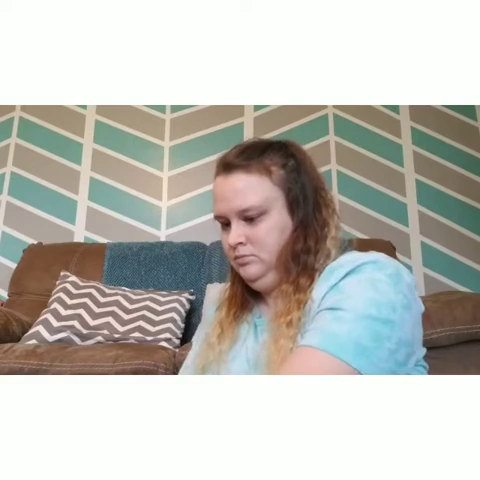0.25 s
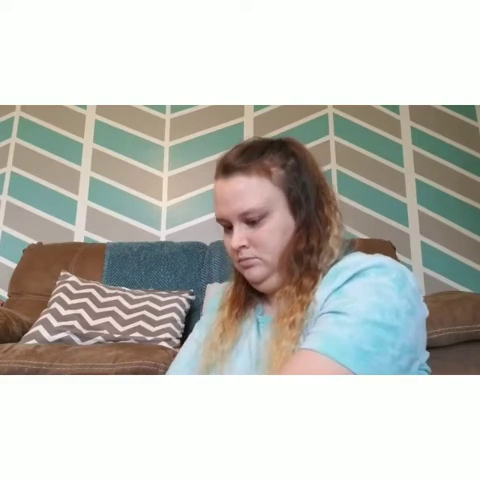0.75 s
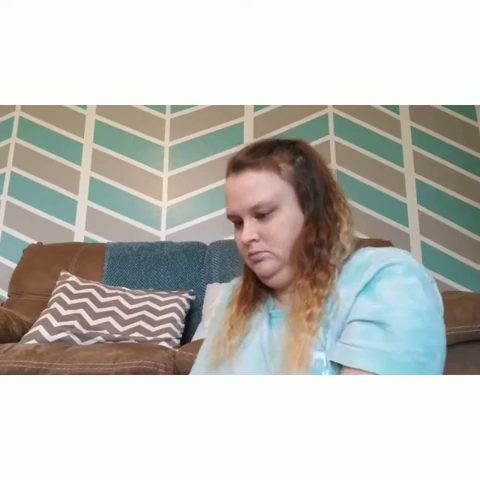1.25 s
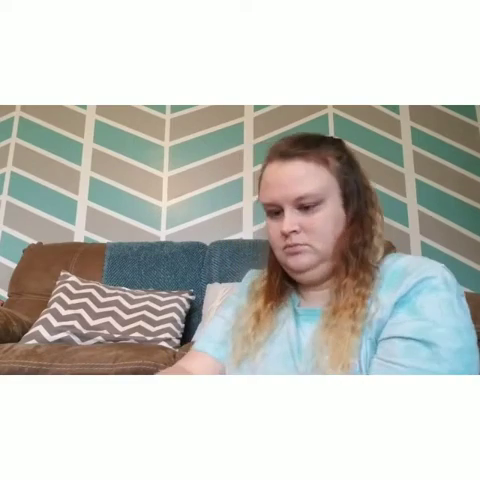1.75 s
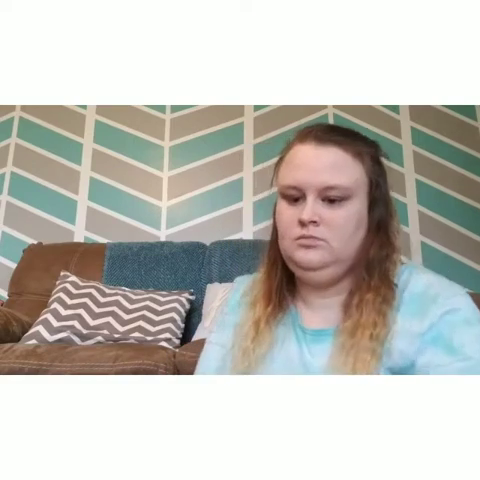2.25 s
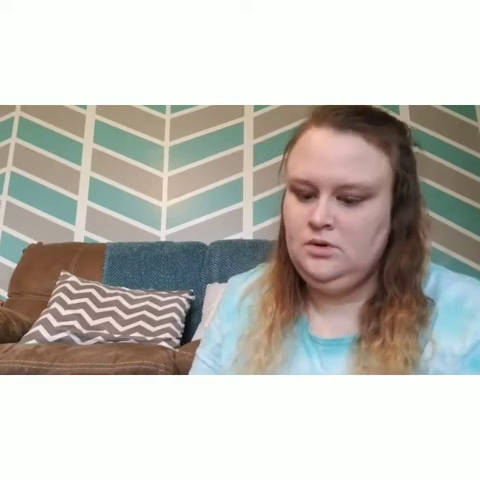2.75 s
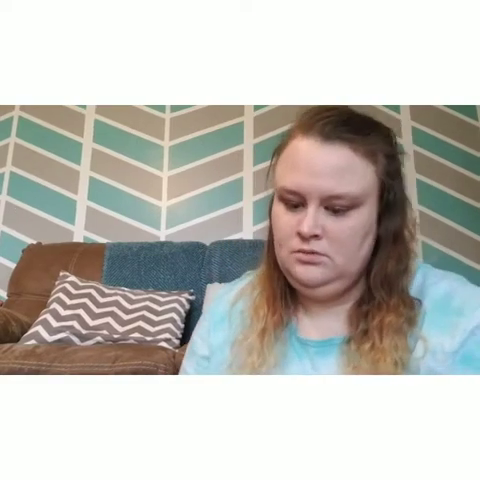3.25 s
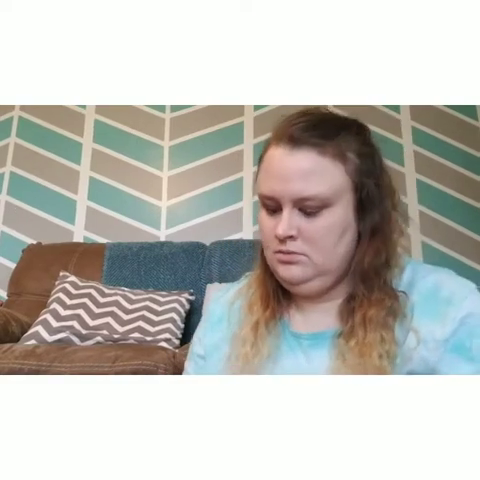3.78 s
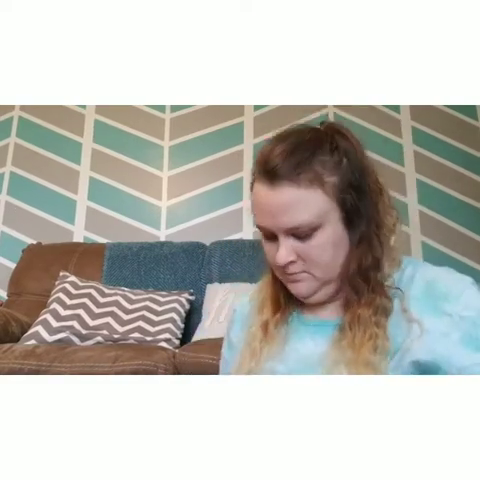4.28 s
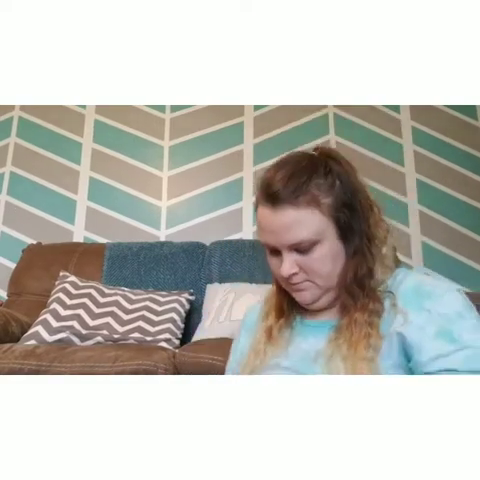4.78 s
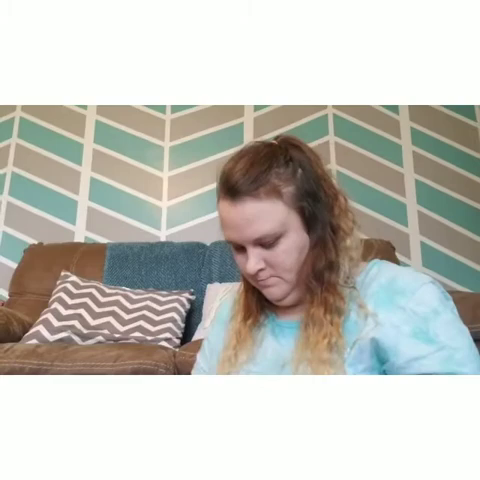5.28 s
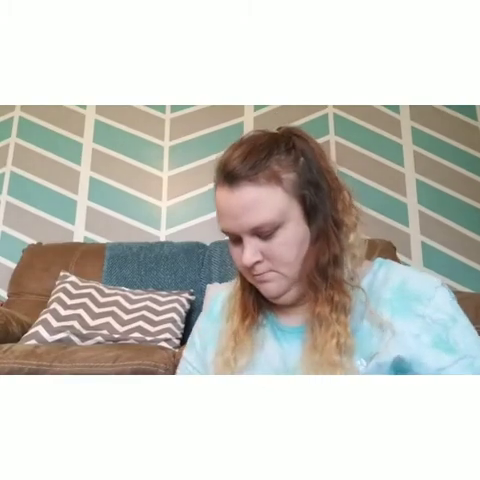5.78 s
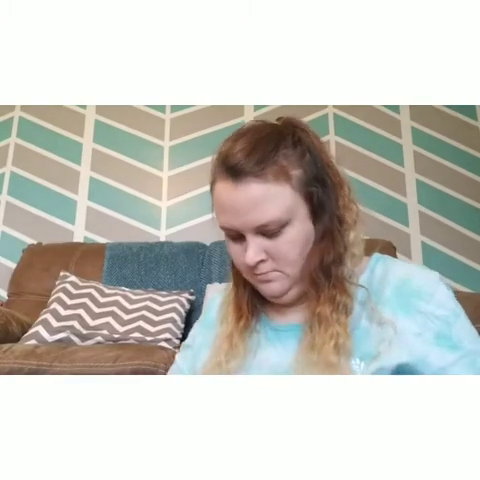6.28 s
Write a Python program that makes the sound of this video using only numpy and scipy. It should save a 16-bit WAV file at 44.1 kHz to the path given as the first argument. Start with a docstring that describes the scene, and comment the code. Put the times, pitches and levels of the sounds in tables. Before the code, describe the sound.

Close, irregular handling of a shipping box indoors: half a second of near silence, soft card friction, a strong thud with a crisp snap just after one second, then sparse picking and knocks. From about three seconds sticky tape comes away in scratchy, snapping jerks, growing denser until a hard tearing rip near six seconds. Short room reflections, faint low background hush, small stereo microphone.

```python
"""First the hush of a living room, then the rustle of hands sliding over a taped cardboard box.
The hands bump the box, pick at the tape, peel it in short pulls and finally rip it loose, close by.
Friction is coloured noise broken into random grains; snaps are short noise bursts with a pulse.
Bumps are decaying sines; creaks are stick-slip impulses ringing panel modes.
All but the hush pass through early reflections and a diffuse room echo."""
import sys
import numpy as np
from scipy import signal
from scipy.fft import rfft, irfft, next_fast_len
from scipy.io import wavfile

SR = 44100
rng = np.random.default_rng(int(sys.argv[2]) if len(sys.argv) > 2 else 0)


def waveform_to_disk(signal):
    """Save audio, clipped to [-1, 1], as 16-bit WAV at the path in sys.argv[1]."""
    frames = np.transpose(np.atleast_2d(signal))
    scaled = np.clip(frames, -1, 1) * 32767
    samples = np.round(scaled).astype(np.int16)
    wavfile.write(sys.argv[1], SR, samples)


N = 287959
TIME = np.arange(N) / SR
SIZE = next_fast_len(N + SR, True)   # transform length, padded so that filters can ring out
HZ = np.maximum(np.fft.rfftfreq(SIZE, 1 / SR), 1)

# A hand slides over card or draws the tape; the sound swells, holds and lets go:
# (full force [s], hold [s], panel rumble [dB], rasp [dB], fibre sizzle [dB]), relative levels
PULLS = [(0.485, 0.027, -58, -66.5, -59.5), (0.556, 0.049, -51.5, -55.5, -50.5),
         (0.703, 0.16, -55, -61, -56.5), (0.8, 0, -42.5, -55.5, -61), (1.037, 0.05, -72, -60.5, -53),
         (1.198, 0, -42.5, -42, -43.5), (1.31, 0.013, -46, -46, -65), (1.38, 0.094, -54, -54, -57),
         (1.5, 0, -66, -50, -45), (1.546, 0.05, -48.5, -47.5, -45), (1.663, 0.038, -46.5, -49.5, -51),
         (1.8, 0.023, -70, -56.5, -56), (2.004, 0.14, -61.5, -56.5, -49.5), (2.472, 0.042, -63, -57, -62),
         (2.628, 0.16, -54.5, -57.5, -63.5), (2.862, 0.15, -66, -59.5, -68), (3.48, 0.23, -64, -62, -78),
         (3.664, 0.014, -44.5, -46.5, -60), (3.778, 0, -53, -47, -53), (3.915, 0.073, -56.5, -63, -60.5),
         (4.128, 0.074, -47.5, -56, -57.5), (4.359, 0.041, -50, -46.5, -48.5),
         (4.459, 0.02, -50, -46.5, -50.5), (4.576, 0.076, -66, -46.5, -43), (4.63, 0.019, -35.5, -34, -41),
         (4.83, 0.11, -70.5, -69, -60.5), (4.977, 0.025, -52, -43.5, -47.5), (5.163, 0, -52.5, -44.5, -51),
         (5.277, 0.21, -55.5, -47.5, -53.5), (5.678, 0.02, -51.5, -45, -50),
         (5.857, 0.021, -57.5, -55, -47), (5.93, 0, -60, -50, -42), (6.294, 0.013, -47.5, -42.5, -50)]
SWELL_DB_PER_S, LET_GO_DB_PER_S = 268, 239
# Tape or card gives way all at once and the rustle dies down:
# (time [s], panel rumble [dB], rasp [dB], fibre sizzle [dB]), relative levels
JERKS = [(0.909, -53, -53.5, -47.5), (1.146, -49, -65, -46.5), (1.255, -40, -38.5, -37.5),
         (2.131, -49.5, -48.5, -50), (2.408, -44, -44, -49), (3.265, -47, -43, -50.5),
         (3.437, -52.5, -54, -63), (3.615, -42, -42.5, -46), (3.839, -49, -49, -55.5),
         (4.016, -45.5, -58, -53.5), (4.307, -55, -55.5, -57), (5.201, -39.5, -36.5, -36.5),
         (5.61, -53, -44.5, -47), (5.728, -43, -62, -50), (5.878, -50, -39.5, -50),
         (5.918, -45, -32.5, -38), (5.962, -31.5, -28.5, -27), (6.164, -53, -53, -73),
         (6.242, -45, -43, -55), (6.391, -55.5, -48, -43.5)]
JERK_RISE_DB_PER_S, JERK_FALL_DB_PER_S = 992, 200
# Fingers resting lightly on the box: (panel rumble [dB], rasp [dB], fibre sizzle [dB]), relative levels
TOUCH_LEVELS = (-71, -69, -66)
TOUCH_FROM_S = 0.42
# Each new grip leaves another patch of card and length of tape free to ring:
# (start [s], panel [Hz], panel lift [dB], flap [Hz], tape [Hz], tape lift [dB], left over right [dB])
GRIPS = [(0, 690, 8.5, 205, 6900, 2.5, -1), (0.766, 218, 12, 636, 7000, -1.5, 0.5),
         (.88, 770, 17, 433, 6800, 1.5, 1.5), (1.174, 133, -9, 540, 1130, 13, 1),
         (1.25, 244, 4, 1030, 2040, 20, 1), (1.45, 215, 5, 990, 1460, 6, 1.5),
         (1.78, 695, 10.5, 227, 1910, 2, 1), (2.451, 91, 17, 580, 1700, 3, 2.5),
         (2.8, 129, 12.5, 744, 5900, 3, 2), (3.2, 724, 9.5, 400, 5200, 0.5, 0.5),
         (3.8, 245, 7, 406, 4040, 2, -0.5), (4.28, 610, 6, 316, 3930, 9, 2),
         (4.55, 280, 9.5, 470, 3400, 10, 1.5), (5.17, 317, 9.5, 603, 2990, 10, 1),
         (5.56, 730, 11, 298, 2750, 11, -1.5), (5.719, 243, 9, 640, 5730, 6.5, -3),
         (5.864, 492, 16, 400, 3130, 3, 0), (6.129, 300, 11.5, 780, 1480, 3, 1.5)]
PEEL_FROM_S, RIP_FROM_S = 3.1, 5.8   # grips starting from here on peel, then rip
# Spectrum of the jolts that shake the panels: (frequency [Hz], level [dB])
RUMBLE_SPECTRUM = [(29, -53), (50, -10.5), (108, -6), (223, 0.5), (253, -6.5), (314, -2.5), (346, -6),
                   (474, -5), (554, -4.5), (993, -5), (1160, -13.5), (1500, -2.5), (1950, -56)]
# Spectrum of sliding over card: (frequency [Hz], level [dB])
SLIDE_SPECTRUM = [(530, -49), (900, 2.5), (991, 1), (1190, -5), (1990, -6), (2660, -4.5), (4570, -3),
                  (5350, -5.5), (7580, -5), (8550, -12), (9770, -12), (15100, -3), (16000, -7)]
# Spectrum of peeling tape: (frequency [Hz], level [dB])
PEEL_SPECTRUM = [(530, -16), (900, -44), (1000, 4), (1160, -5.5), (1640, -2), (1850, -6.5), (2730, -2.5),
                 (3110, -1.5), (3430, -6), (4520, -2), (5680, -5), (7400, -7), (8980, -17), (15100, -7.5),
                 (16000, -12)]
# Spectrum of the rip: (frequency [Hz], level [dB])
RIP_SPECTRUM = [(530, -35), (900, 2), (1130, -6), (1310, -2.5), (1750, -10), (2450, -2.5), (3000, -2),
                (3730, -6.5), (5350, -9), (6480, -7.5), (9310, -18), (14700, -9), (16000, -16)]
# Snaps of tape and card, with relative levels of three bands:
# (time [s], decay [s], ring [Hz], body [dB], crack [dB], top [dB], left over right [dB])
SNAPS = [(0.902, 0.0012, 7120.0, -44.5, -41, -44.5, 3.5), (1.2563, 0.002, 5100, -33, -38.5, -29.5, 4),
         (1.491, 0.00054, 6140.0, -52, -64, -58, 10), (1.6366, 0.0005, 5830.0, -57, -59, -59, 1),
         (1.6753, 0.0018, 1910.0, -48, -46.5, -62, 4.0), (2.129, 0.0013, 2070, -38, -52, -51.5, 1.0),
         (2.1384, 0.0023, 2440.0, -47.5, -46, -37, 0), (2.3496, 0.0008, 7080.0, -50.5, -63, -54, 3),
         (2.3962, 0.00089, 1860, -27.5, -35, -38, 0.5), (2.4143, 0.0009, 1830.0, -33, -44.5, -56, -2.0),
         (2.6351, 0.00053, 4150.0, -51, -66, -72, -6), (2.7389, 0.0012, 3600, -39, -41, -41, -0.5),
         (3.2453, 0.0027, 3640.0, -69, -40.5, -52.5, 0), (3.2507, 0.0015, 3900, -42.5, -29, -43, 0.5),
         (3.4368, 0.00065, 3740, -67, -51.5, -65, -3), (3.5938, 0.0037, 4160.0, -73, -39, -42.0, 1),
         (3.6047, 0.0011, 4400, -48, -23.5, -34, -0.5), (3.611, 0.00089, 3400, -61, -28.0, -45, -3.0),
         (3.6308, 0.00067, 6060.0, -66, -42, -53.0, -2), (3.9834, 0.0007, 4310.0, -76.5, -53.5, -53.5, -2),
         (4.1231, 0.00055, 4460.0, -63, -45.5, -50.5, 3), (4.163, 0.00098, 5260.0, -48, -50, -49, 4),
         (4.6211, 0.002, 4370.0, -57, -32.5, -54, -4), (4.6264, 0.0016, 4080.0, -54, -36, -52, -7),
         (4.9685, 0.0016, 4250, -58, -39, -56, 4), (5.1518, 0.00076, 3720.0, -51, -34, -55, 0.0),
         (5.1923, 0.0017, 4570, -39.5, -22, -24.5, 0), (5.3197, 0.0014, 3380, -69, -38.5, -57, -3),
         (5.3674, 0.0013, 3730, -70, -41.0, -62, -2), (5.396, 0.00092, 3440, -50.5, -39.5, -57, -6),
         (5.4065, 0.0021, 3300, -58, -35.5, -59, 1.0), (5.5084, 0.0012, 2800.0, -58, -45, -63.5, -2),
         (5.594, 0.0015, 3660, -68, -41, -56.0, -4), (5.6062, 0.00063, 3030, -59, -37.5, -61, 1.0),
         (5.643, 0.0009, 4470, -46, -37.5, -35, 2), (5.6758, 0.0022, 3170, -51, -40.5, -54, 4),
         (5.6794, 0.0025, 2770, -57, -36, -55, 3), (5.7342, 0.0024, 4460.0, -36, -53, -43, 5),
         (5.8769, 0.0028, 1510, -32.5, -36.5, -40, 2.5), (5.933, 0.00061, 3080.0, -58, -39.5, -41, 5.0),
         (5.9508, 0.0015, 3200.0, -44.0, -28, -24, 14), (5.964, 0.002, 2980, -31.5, -30, -32, -3),
         (5.9681, 0.0031, 2990.0, -35, -29, -41, 1), (6.023, 0.0025, 3200, -35.5, -39, -36.5, 3),
         (6.158, 0.001, 1570, -37.5, -44, -54, 3.5), (6.2458, 0.0011, 2180, -42, -41.5, -51.0, -1),
         (6.2834, 0.0008, 4670, -42, -40.5, -55, 7), (6.3831, 0.0012, 7100, -52, -40, -31.5, 1)]
# Spectrum shared by the snaps: (frequency [Hz], level [dB])
SNAP_SPECTRUM = [(88, -43), (150, -4), (321, -11), (649, -2), (1120, -9), (1530, -3), (1870, 1),
                 (2270, -3.5), (4160, 0), (6260, -4.5), (7470, 3), (8230, -6), (11500, -2), (13400, 5.5),
                 (16000, 26.5)]
# Dull bumps and knocks on the box: (time [s], main mode [Hz], relative level [dB], 60 dB decay [s])
BUMPS = [(0.793, 194, -37.5, 0.048), (1.189, 127, -22.5, 0.063), (1.2395, 121, -11.5, 0.01),
         (1.539, 113, -40.5, 0.11), (1.684, 119, -36, 0.033), (1.998, 527, -43, 0.037),
         (2.275, 573, -49, 0.037), (2.395, 678, -32.5, 0.05), (2.396, 1930, -29.5, 0.014),
         (2.459, 77.5, -51.5, 0.45), (2.634, 650, -43.5, 0.028), (3.083, 738, -51.5, 0.025),
         (3.837, 270, -41.5, 0.051), (5.231, 313, -36.5, 0.09), (5.735, 276, -32, 0.023),
         (5.8767, 1350, -31, 0.02), (5.963, 524, -32, 0.047), (6.157, 322, -35.5, 0.036)]
# A flap sticks and slips under strain:
# (start [s], end [s], mean slip rate [about 1/s], relative level [dB], low-mode lean [dB], high-mode lean [dB])
CREAKS = [(2.649, 2.759, 106, -47, 2.5, -0.5), (4.047, 4.136, 104, -45.5, -8, -8.5)]
# Modes of the box panels: (frequency [Hz], relative level [dB], 60 dB decay [s])
PANEL_MODES = [(122, -5, .07), (215, -6, .03), (314.5, 0, .15), (424, -1, .15), (580, -7, .04),
               (787, -8, .07), (1560, -17, .03)]
# Spectrum of the quiet room: (frequency [Hz], level [dB])
HUSH_SPECTRUM = [(15, -42), (25, -14), (40, -6.5), (59, -5), (180, -26.5), (317, -23), (400, -27.5),
                 (2050, -33), (7310, -39.5), (8590, -44.5), (14800, -27.5), (16000, -48)]
HUSH_DB = -69.5
# Stereo width of two microphone ports: (frequency [Hz], side over mid [dB])
STEREO_WIDTH = [(60, -10), (250, -15), (500, -12.5), (1000, -3), (2000, -4), (4000, 0), (15000, 1.5)]
# Balance of the two ports: (frequency [Hz], left over right [dB])
PORT_BALANCE = [(100, 1), (1000, 0), (2000, 1.5), (2800, 3), (4200, -4.5), (6400, 3), (10000, 0),
                (14000, 4.5)]
ROOM_T60_S = 0.36
MIC_LOW_HZ, CUTOFF_HZ = 64, 16000


def friction(panel_db, rasp_db, sizzle_db, flap_lift_db=7, panel_sharpness=4.3, tape_sharpness=2.54):
    """Granular friction: fibre releases excite resonances of tape and card, and jolts shake the panels."""
    slide = colour(grains(per_s=500, spread_db=4.5, grain_s=.0004, smooth=.75), SLIDE_SPECTRUM)
    peel = colour(grains(per_s=600, spread_db=2.8, grain_s=.0006, smooth=.6), PEEL_SPECTRUM)
    rip = colour(grains(per_s=850, spread_db=2.5, grain_s=0.00099, smooth=0.35), RIP_SPECTRUM)
    jolts = colour(grains(per_s=140, spread_db=0.0, grain_s=0.012, smooth=0.2), RUMBLE_SPECTRUM)
    out = np.zeros((2, N))
    edges = [0] + [round(grip[0] * SR) for grip in GRIPS[1:]] + [N]
    for grip, start, end in zip(GRIPS, edges, edges[1:]):
        s, panel_hz, panel_lift_db, flap_hz, tape_hz, tape_lift_db, side_db = grip
        held = slice(max(start - SR // 20, 0), end)   # the card is already ringing when the grip changes
        if s < PEEL_FROM_S:
            surface = slide
        elif s < RIP_FROM_S:
            surface = peel
        else:
            surface = rip
        surface = lift(surface[:, held], tape_hz, tape_lift_db, tape_sharpness)
        panel = lift(jolts[:, held], panel_hz, panel_lift_db, panel_sharpness)
        panel = lift(panel, flap_hz, flap_lift_db, panel_sharpness)
        panel = rms_one(band(panel, 53, 1016, order=4)) * from_db(panel_db[held] - 4.0)
        rasp = rms_one(band(surface, 1023, 7540, order=4)) * from_db(rasp_db[held] - 4.0) * pan(side_db)
        sizzle = rms_one(band(surface, 7930, 19700, order=4)) * from_db(sizzle_db[held] - 1.77)
        out[:, start:end] += (panel + rasp + sizzle)[:, start - end:]
    return out


def effort():
    """Power addition: pulls, jerks and the light touch sum into (panel, rasp, sizzle) envelopes in dB."""
    moves = [(s, hold_s, SWELL_DB_PER_S, LET_GO_DB_PER_S, levels) for s, hold_s, *levels in PULLS]
    moves += [(s, 0, JERK_RISE_DB_PER_S, JERK_FALL_DB_PER_S, levels) for s, *levels in JERKS]
    moves += [(TOUCH_FROM_S, N / SR, SWELL_DB_PER_S, LET_GO_DB_PER_S, TOUCH_LEVELS)]   # held to the end
    t = TIME[::32]   # slow curves need few points
    power = 0
    for s, hold_s, rise, fall, levels in moves:
        shape_db = -rise * np.maximum(s - t, 0) - fall * np.maximum(t - s - hold_s, 0)
        power = power + from_db(np.add.outer(levels, shape_db)) ** 2
    return [np.interp(TIME, t, 10 * np.log10(p + 1e-20)) for p in power]


def grains(per_s, spread_db, grain_s, smooth, tug_db=0.88, tug_hz=35):
    """Random release: fibres let go in tiny bursts of varied size over a hiss that comes in uneven tugs."""
    released = rng.random(N) < per_s / SR
    size = from_db(spread_db * np.minimum(rng.exponential(1, N), 4))
    energy = signal.lfilter([1], [1, -np.exp(-1 / (grain_s * SR))], released * size ** 2 + 1e-18)
    # smooth is the steady share of the power, the rest follows the grains
    hiss = rng.standard_normal((2, N)) * np.sqrt(smooth + (1 - smooth) * energy / energy.mean())
    tugs = rms_one(band(rng.standard_normal(N), tug_hz / 2, tug_hz * 2, order=2))
    return ports(hiss * from_db(tug_db * tugs))


def snaps(body_db=-1.0, crack_db=.7, top_db=.7, rise_share=.5, pulse=3.6, ring_db=9.0, sharpness=2.2):
    """Impulsive fracture: a brief break clicks, while a run of fibres swells and fades over milliseconds."""
    out, lead, length = np.zeros((2, N)), SR // 100, SR // 32
    t = TIME[:length] - TIME[lead]
    # the rise takes rise_share of the decay time
    shapes = np.array([np.exp(-np.maximum(t, -t / rise_share) / row[1]) for row in SNAPS])
    parts = [(260, 1140, body_db), (1840, 7900, crack_db), (7770, 13580, top_db)]
    for k, (low_hz, high_hz, gain_db) in enumerate(parts):
        bursts = rng.standard_normal((len(SNAPS), 2, length)) * shapes[:, None]
        bursts[:, 0, lead] += pulse   # the break itself: one clean pulse at the height of the burst
        bursts = [lift(burst, row[2], ring_db, sharpness) for burst, row in zip(bursts, SNAPS)]
        in_a_row = band(colour(ports(np.hstack(bursts)), SNAP_SPECTRUM), low_hz, high_hz)
        for (s, _, _, *levels_db, side_db), burst in zip(SNAPS, np.split(in_a_row, len(SNAPS), axis=1)):
            at = round(s * SR) - lead
            burst = rms_one(burst) * np.sqrt(.004 * SR / length)   # levels refer to a 4 ms average
            out[:, at:at + length] += burst * from_db(levels_db[k] + gain_db) * pan(side_db)
    return out


def bumps(overtone=1.88, overtone_db=-10, undertone=0.655, undertone_db=-16):
    """Modal ringing: a push on the card excites a main mode and a weaker, shorter one on either side."""
    out, t = np.zeros(N), TIME[:SR // 4]
    for s, hz, db, t60 in BUMPS:
        phase, decay = 2 * np.pi * hz * t, from_db(-60 * t / t60)
        neighbours = from_db(overtone_db) * np.sin(overtone * phase)
        neighbours += from_db(undertone_db) * np.sin(undertone * phase)
        at = round(s * SR)
        out[at:at + len(t)] += from_db(db) * decay * (np.sin(phase) + neighbours * decay)
    return out


def creaks():
    """Stick-slip: uneven slips act as impulses that ring the damped modes of the panels."""
    out = np.zeros(N)
    for start, end, per_s, level_db, low_db, high_db in CREAKS:
        chance = rng.standard_normal((40, 1 + len(PANEL_MODES)))
        intervals = np.exp(.1 * chance[:-1, 0]) / per_s
        slips = start + np.append(0, np.cumsum(intervals))
        kept = slips < end
        sound = np.zeros(N)
        for k, (hz, db, t60) in enumerate(PANEL_MODES):
            force = np.zeros(N)
            force[(slips[kept] * SR).astype(int)] = from_db(3.5 * chance[kept, k + 1])
            lean_db = np.interp(k, [0, 2, len(PANEL_MODES) / 2], [low_db, 0, high_db])
            radius, angle = from_db(-60 / (t60 * SR)), 2 * np.pi * hz / SR
            resonator = [1, -2 * radius * np.cos(angle), radius ** 2]
            ringing = rms_one(signal.lfilter([1], resonator, force + 1e-18))
            sound += from_db(db + lean_db) * ringing
        during = (TIME > start) & (TIME < end)
        out += from_db(level_db) * sound / np.sqrt(np.mean(sound[during] ** 2))
    return out


def room(x, wet_db, early_db=-13, gap_s=.0095, early_span_s=.024, build_s=0.0023, dull_hz=9000, count=9):
    """Reverberation: separate reflections off floor and furniture join a decaying diffuse echo."""
    t = TIME[:SR // 2]
    build = 1 - np.exp(-(np.maximum(t - gap_s / 2, 0) / build_s) ** 2)
    echo = rng.standard_normal((2, len(t))) * from_db(-60 * t / ROOM_T60_S) * build
    echo = signal.sosfilt(signal.butter(1, dull_hz, fs=SR, output="sos"), ports(echo))
    echo *= from_db(wet_db) / np.sqrt(np.sum(echo ** 2) / 2)
    early = np.zeros(len(t))
    delays = gap_s + early_span_s * ((np.arange(count) + rng.random(count)) / count) ** 2
    early[(delays * SR).astype(int)] = rng.choice([-1, 1], count) / np.sqrt(count)
    echo += from_db(early_db) * band(early, 770, 11000, order=1)   # small surfaces return no bass
    return x + signal.fftconvolve(x, echo, axes=1)[:, :N]


def hush():
    """Stationary noise: the steady background of the quiet room is noise given a fixed spectrum."""
    noise = ports(rng.standard_normal((2, N)))
    return from_db(HUSH_DB) * rms_one(colour(noise, HUSH_SPECTRUM))


def ports(pair):
    """Spatial coherence: two unrelated signals become stereo, alike in the bass and apart in the treble."""
    mid, side = rfft(pair, SIZE)
    width = gains(STEREO_WIDTH)
    both = np.array([mid + width * side, mid - width * side]) / np.sqrt(1 + width ** 2)
    tilt = gains(PORT_BALANCE)
    both = both * np.array([tilt, np.ones_like(tilt)]) / np.sqrt((1 + tilt ** 2) / 2)
    return irfft(both, SIZE)[:, :pair.shape[-1]]


def pan(db):
    """Constant power: left and right gains differ by the given dB at equal total power."""
    pair = np.array([from_db(np.atleast_1d(db) / 2), from_db(-np.atleast_1d(db) / 2)])
    return pair / np.sqrt(np.mean(pair ** 2, axis=0))


def lift(x, hz, lift_db, sharpness):
    """Resonance: a peak filter raises the sound around one frequency."""
    b, a = signal.iirpeak(hz, sharpness, fs=SR)
    return x + (from_db(lift_db) - 1) * signal.lfilter(b, a, x)


def colour(x, points):
    """Minimum phase: a folded cepstrum turns a spectrum into a causal filter."""
    cepstrum = irfft(np.log(gains(points)), SIZE)
    cepstrum[1:SIZE // 2] *= 2
    cepstrum[SIZE // 2 + 1:] = 0
    return irfft(rfft(x, SIZE) * np.exp(rfft(cepstrum)), SIZE)[..., :x.shape[-1]]


def gains(points):
    """Logarithmic pitch scale: levels are interpolated over log frequency and turned into gains."""
    hz, db = np.transpose(points)
    return from_db(np.interp(np.log(HZ), np.log(hz), db))


def band(x, low_hz, high_hz, order=3):
    """Band limiting: a Butterworth filter passes one frequency range."""
    return signal.sosfilt(signal.butter(order, [low_hz, high_hz], "band", fs=SR, output="sos"), x)


def rms_one(x):
    """Normalisation: scale to unit mean power."""
    return x / np.sqrt(np.mean(x ** 2) + 1e-20)


def from_db(db):
    """Logarithmic level: decibels become an amplitude gain."""
    return 10 ** (np.asarray(db) / 20)


def scene():
    """Superposition: friction, creaks, snaps and bumps echo in the room and add to its hush."""
    rubbing = friction(*effort()) + creaks() * pan(4.6)
    rubbing = room(rubbing, wet_db=-14.5, early_db=-16.5)
    breaks = room(snaps(), wet_db=-12.5, early_db=-12)
    knocks = room(bumps() * pan(1.7), wet_db=-10.5, early_db=1.5)
    return rubbing + breaks + knocks + hush()


def record(dry):
    """Band-limited pickup: the small microphone loses the deep bass, and the top is cut steeply."""
    thin = signal.sosfilt(signal.butter(2, MIC_LOW_HZ, "high", fs=SR, output="sos"), dry)
    return signal.sosfilt(signal.ellip(12, .2, 80, CUTOFF_HZ, fs=SR, output="sos"), thin)


dry = scene()
out = record(dry)
waveform_to_disk(out)
```